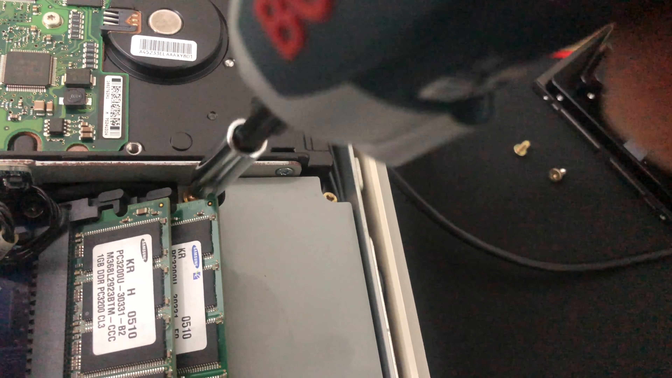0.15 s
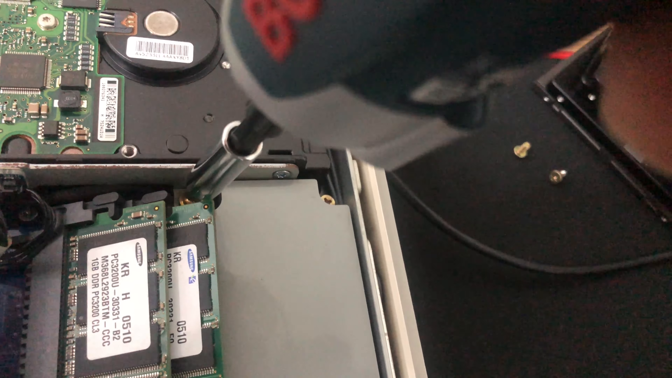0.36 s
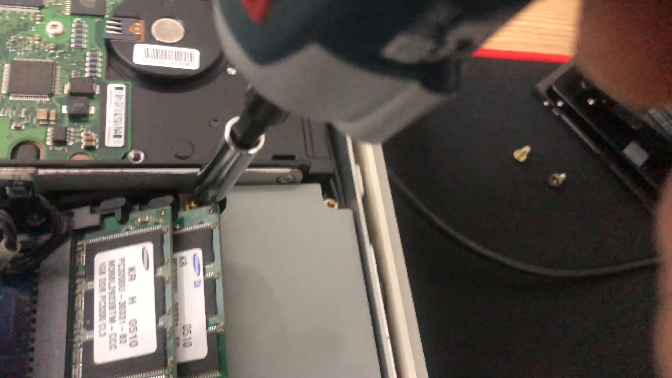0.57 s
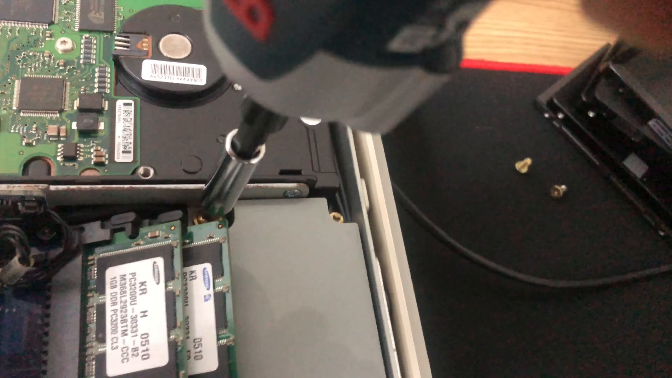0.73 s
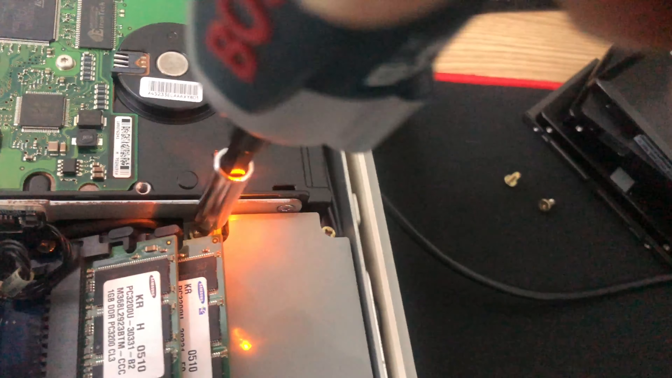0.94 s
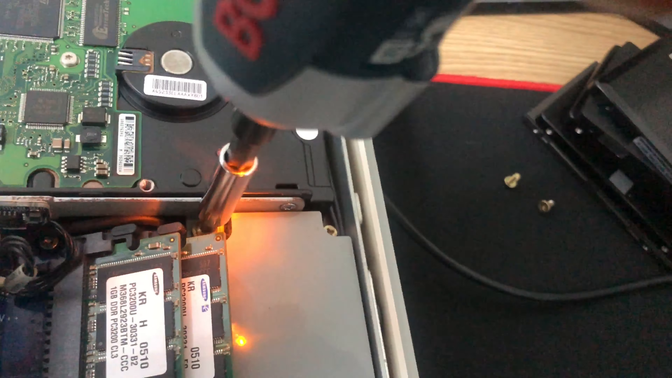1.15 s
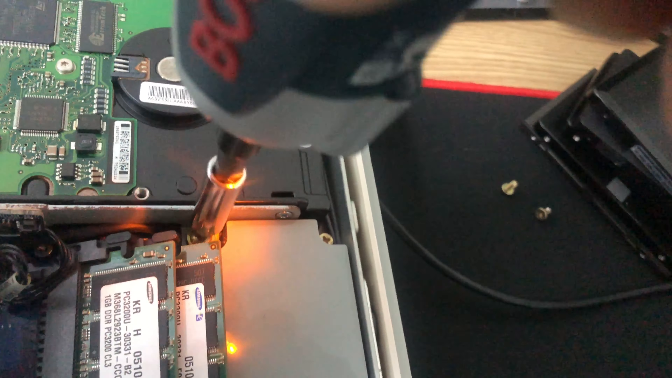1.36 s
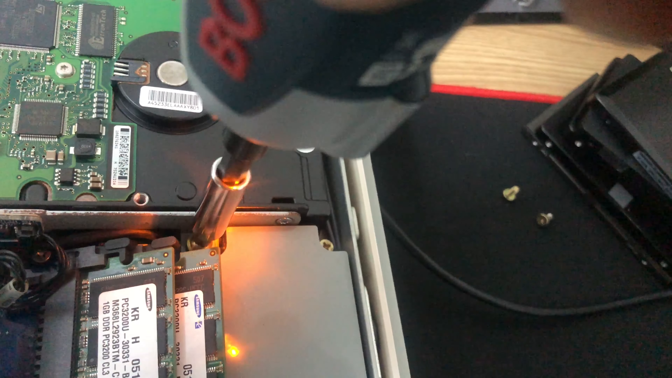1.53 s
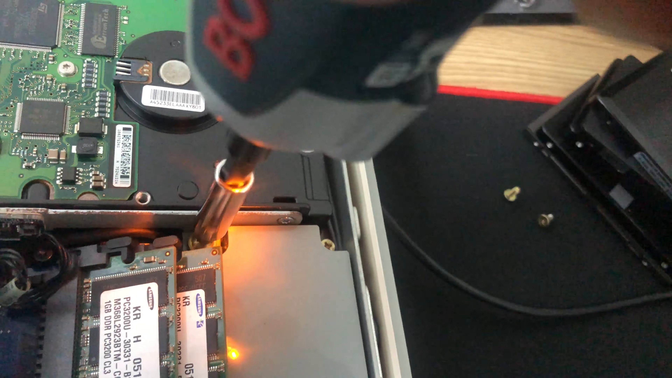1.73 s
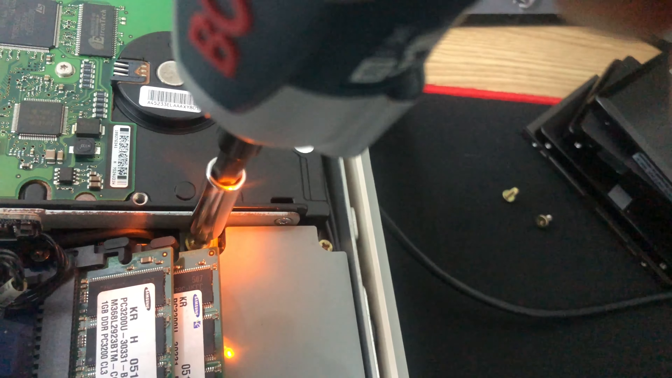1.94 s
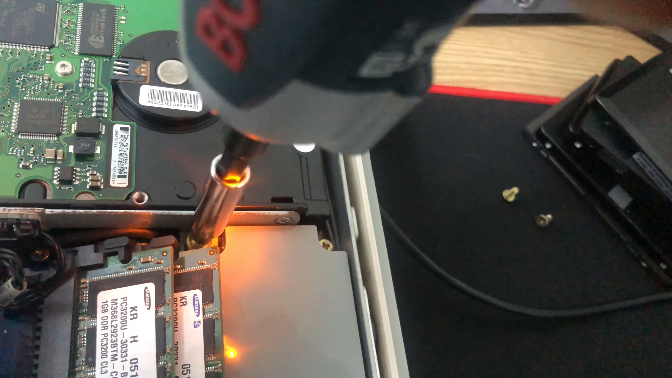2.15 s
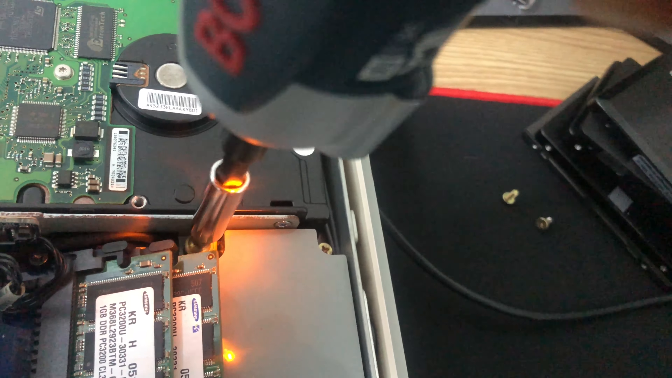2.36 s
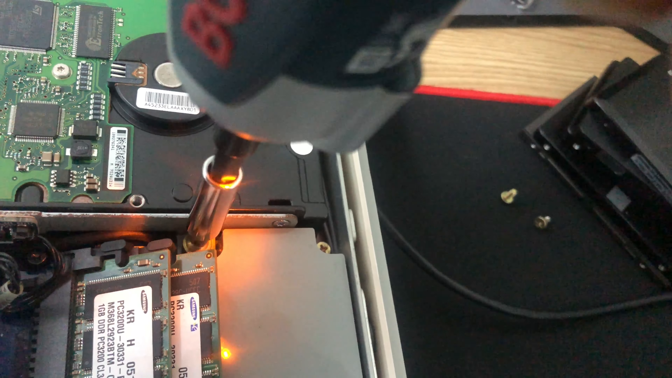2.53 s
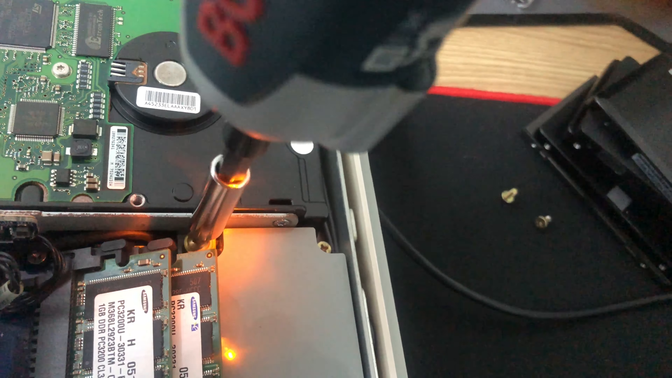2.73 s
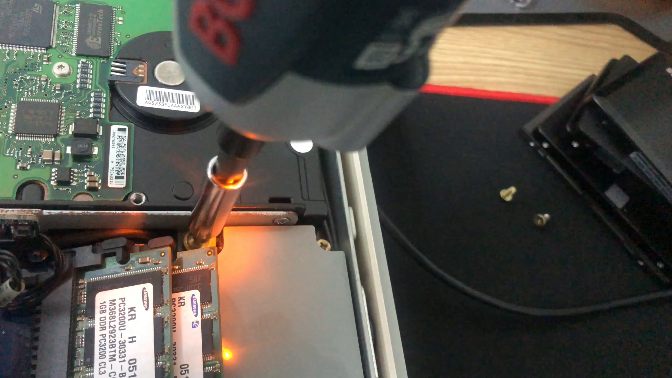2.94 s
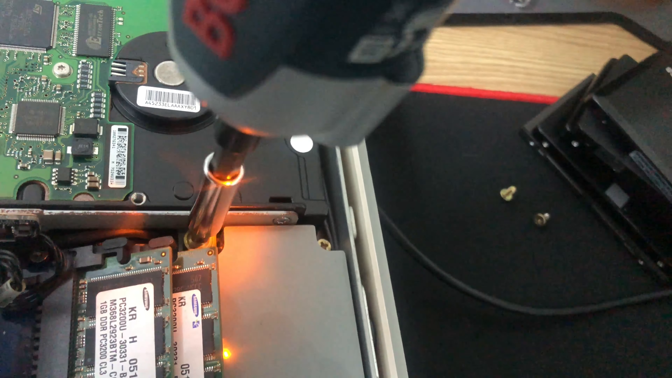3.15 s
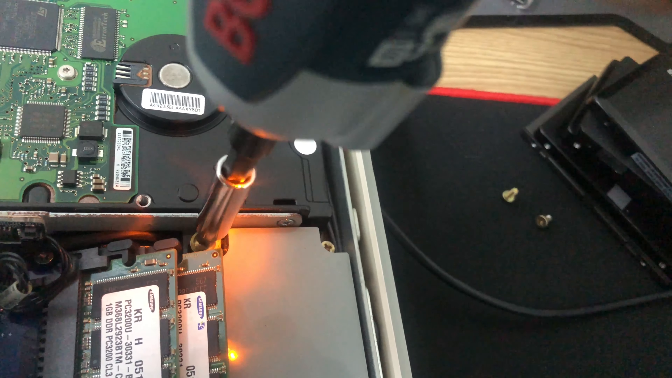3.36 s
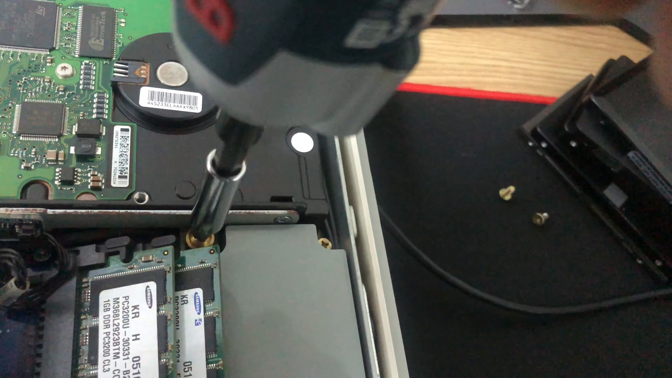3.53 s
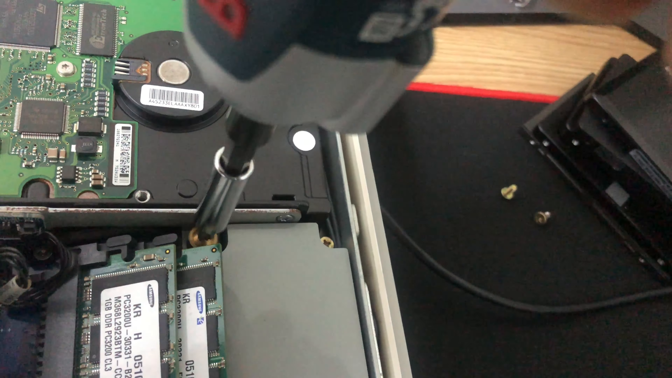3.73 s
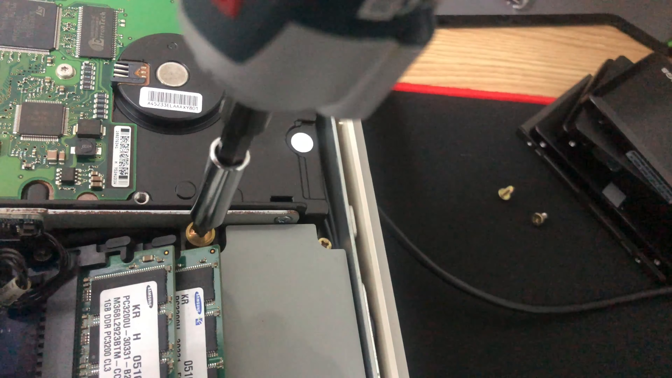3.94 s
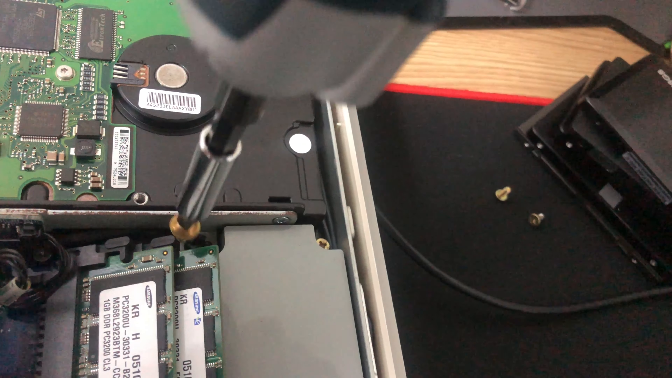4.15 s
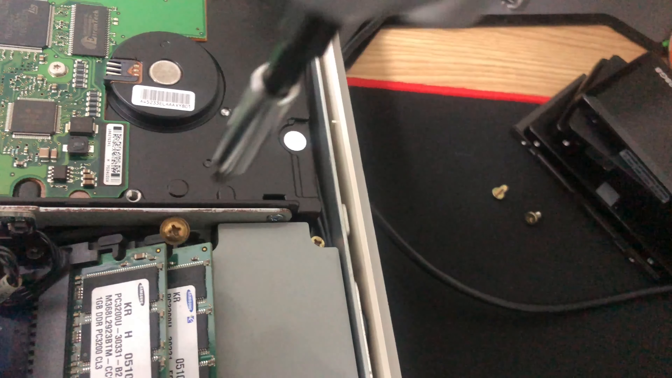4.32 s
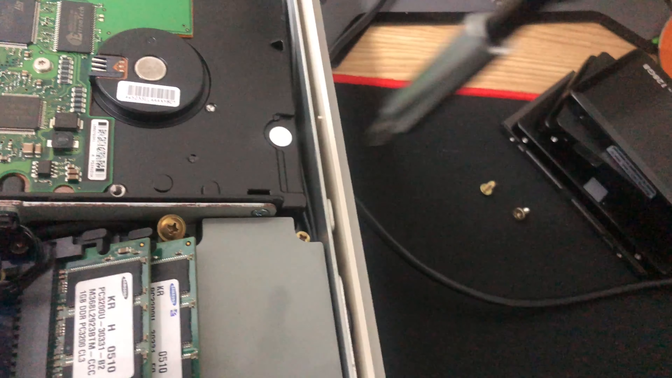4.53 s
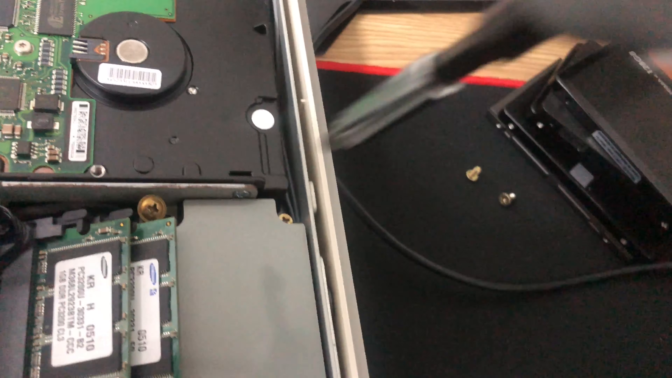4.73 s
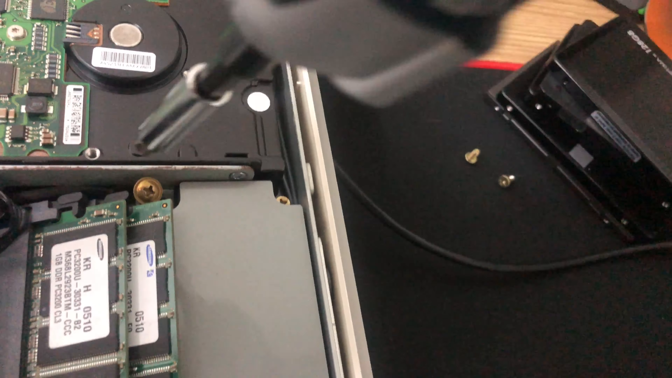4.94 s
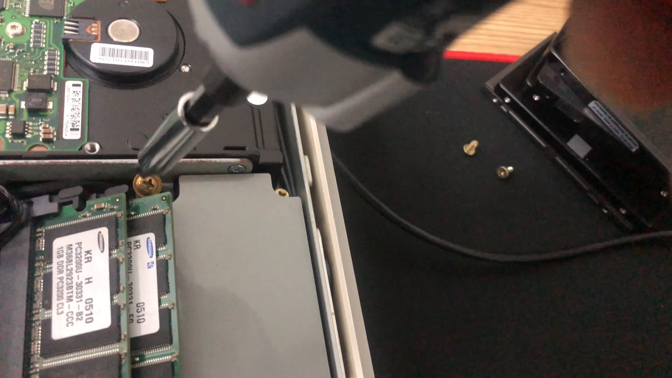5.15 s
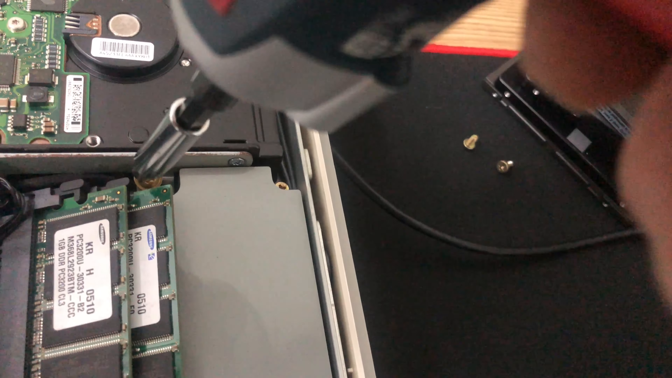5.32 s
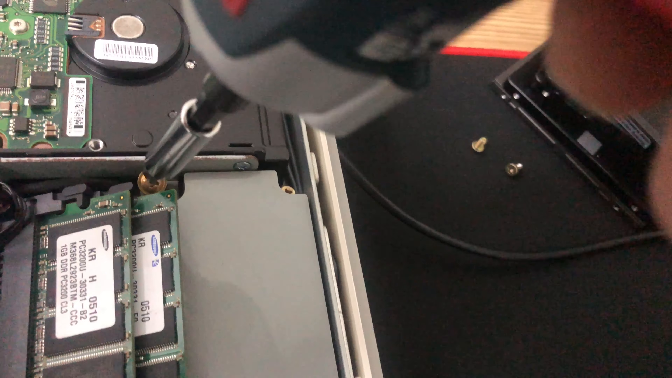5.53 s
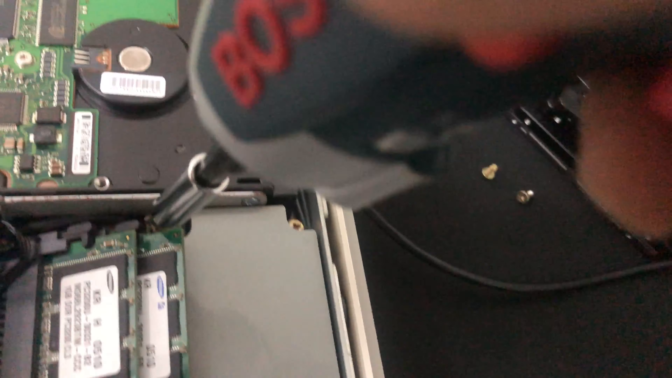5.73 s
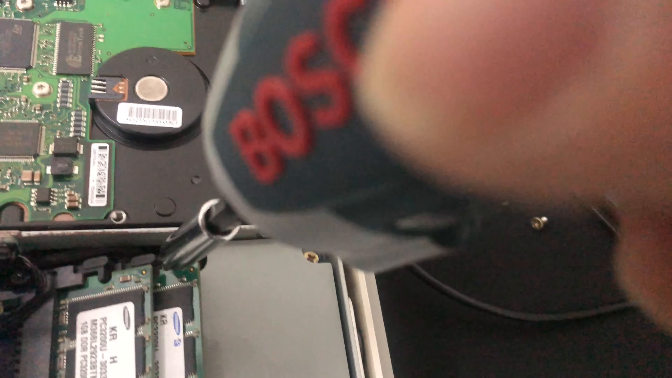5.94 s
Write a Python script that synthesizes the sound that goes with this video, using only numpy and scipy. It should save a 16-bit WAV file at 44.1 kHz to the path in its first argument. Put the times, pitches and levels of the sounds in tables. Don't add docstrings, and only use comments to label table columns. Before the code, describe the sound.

Close up in a quiet room, a screwdriver bit ticks and knocks against a metal chassis for about a second. The small motor then starts sharply, whining and rattling with gritty gears for two and a half seconds, dipping slightly as the screw binds. It coasts down in falling pitch, followed by scrapes and clicks, near silence, a tiny squeak, and bright final clicks.

```python
import sys
import numpy as np
from scipy import signal
from scipy.fft import rfft, irfft, next_fast_len
from scipy.io import wavfile
from scipy.ndimage import uniform_filter1d, map_coordinates

SR = 44100
rng = np.random.default_rng(int(sys.argv[2]) if len(sys.argv) > 2 else 0)


def to_wav(s):
    ch = np.atleast_2d(s).T
    pcm = np.round(np.clip(ch, -1, 1) * 32767)
    wavfile.write(sys.argv[1], SR, pcm.astype(np.int16))


def voltage_ratio(decibels):
    exponent = np.asarray(decibels, float) / 20
    return 10 ** exponent


N = 268128
T = np.arange(N) / SR


def unit(x):
    return x / np.sqrt(np.mean(x ** 2) + 1e-20)


def along(points, hz):
    f, v = np.transpose(points)
    return np.interp(np.log(hz + 1), np.log(f + 1), v)


def curves(rows):
    s, *cols = np.transpose(rows)
    return [np.interp(T, s, c) for c in cols]


def span(start_s, end_s):
    return uniform_filter1d(1. * (T > start_s) * (T < end_s), size=90)


def wobble(rate):
    coarse = T[::8]
    knots = rng.standard_normal(int(N * rate / SR) + 4)
    return np.interp(T, coarse, map_coordinates(knots, [coarse * rate]))


def filtered(x, gain, causal=False):
    m = 2 * next_fast_len(len(x) // 2 + 2048)
    g = gain(np.fft.rfftfreq(m, 1 / SR))
    if causal:
        c = irfft(np.log(g + 1e-6), m)
        c[1:m // 2] *= 2
        c[m // 2 + 1:] = 0
        g = np.exp(rfft(c))
    return irfft(rfft(x, m) * g, m)[:len(x)]


def above(hz, edge_hz, order=4):
    return 1 / np.sqrt(1 + (edge_hz / (hz + 1)) ** (2 * order))


def peak(hz, centre_hz, width_hz):
    return hz * width_hz / np.hypot(centre_hz ** 2 - hz ** 2, hz * width_hz + 1)


# t/s, speed/(turns per s)
SPEED = [
    (0.965, 180),
    (1.065, 240),
    (1.15, 205),
    (1.21, 235.5),
    (1.31, 258.2),
    (1.38, 262.7),
    (1.47, 264.3),
    (1.75, 267),
    (2.9, 267.4),
    (3.49, 268),
]
# t/s, speed lost/(turns per s)
BINDS = [
    (1.6, 5.5),
    (1.87, 8.3),
    (2.18, 4.6),
    (2.49, 3.4),
    (2.82, 3),
]
BIND_S, RECOVER_S = .05, .125
CONTACT_S = .9645
RELEASE_S, TOP_SPEED = SPEED[-1]
COAST_S = .766


def shaft():
    drag = 0
    for s, lost in BINDS:
        width_s = np.where(T < s, BIND_S, RECOVER_S)
        drag = drag + lost * np.exp(-((T - s) / width_s) ** 2)
    progress = np.clip((T - RELEASE_S) / COAST_S, 0, 1)
    coast = TOP_SPEED * (1 - np.sin(np.pi / 2 * progress))
    return np.where(T < RELEASE_S, curves(SPEED)[0] - drag, coast)


IDLE, STALL = 268, 17


def running(speed):
    speed_db = 20 * np.log10(np.clip((speed - STALL) / (IDLE - STALL), 1e-4, 1))
    return speed_db, (IDLE - speed) * (T < RELEASE_S)


PLANET = .593
BLOW_SHARE = 2.2


def planet_knocks(turns, on):
    at = np.flatnonzero(np.diff(np.floor(PLANET * turns)))
    luck = rng.standard_normal((len(at), 2))
    size_db = 2.5 * np.tanh(.6 * luck[:, 1]) + 2 * np.tanh(.7 * wobble(18)[at])
    jitter = (6 * luck[:, 0]).astype(int)
    blows = np.zeros(N)
    blows[np.clip(at + jitter, 0, N - 1)] = voltage_ratio(size_db)
    decay = voltage_ratio(-60 * T[:600] / .0045)
    burst = signal.fftconvolve(blows, decay)[:N] * rng.standard_normal(N)
    colour = lambda f: (0.18 + above(f, 2800, order=2)) / (1 + (f / 9500) ** 4)
    sharp = filtered(burst + BLOW_SHARE * blows, colour, causal=True)
    return unit(sharp * on) * np.sqrt(np.mean(on))


# f/Hz, level/dB per Hz
HOUSING = [(350, -42.5), (600, -16.5), (778, -12.5), (856, -5), (1540, 0), (2810, -9.5), (4230, -4),
           (10100, -2), (11500, -7), (15700, -12.5)]
# f/Hz, width/Hz, level/dB
SHELL = [(1520, 410, -8.5), (2206, 240, -4), (3277, 560, 0), (4215, 300, -3.5), (5670, 32, -3.5),
         (8400, 340, -11), (12200, 600, 0), (14000, 520, -5.5)]
# f/Hz, width/Hz, depth/(0-1)
HOLLOWS = [(2784, 210, 0.3), (3655, 140, 0.7), (13950, 300, .4)]


def shell(f):
    bumps = 1 + sum(voltage_ratio(db) * peak(f, c, w) ** 2 for c, w, db in SHELL)
    dips = np.prod([1 - np.clip(d, 0, .9) * peak(f, c, w) ** 2 for c, w, d in HOLLOWS], axis=0)
    return (voltage_ratio(along(HOUSING, f)) + voltage_ratio(-15.5) * above(f, 150)) * bumps * dips


# level at full speed/dB, growth/(dB per dB of speed), load/(dB per turn/s of lag), clatter share/1
LAYERS = [
    (-33.5, 0.97, 0.32, 0.68),
    (-39, 0.63, 0.03, .3),
    (-35.5, 1.4, 0.48, .4),
]
# t/s, level/dB
CLATTER = [(1.075, 1), (1.21, 3.5), (1.3, -1.5), (1.49, 2), (1.59, 0.5), (1.67, 0.5), (1.77, 5.5),
           (1.95, 3), (2.17, 1.5), (2.26, 5), (2.42, 0.5), (2.8, 2.5), (2.865, 5.5), (3.33, 3.5),
           (3.43, -2.5), (3.69, 5.5), (3.8, 0.5)]
# f/Hz, width/Hz, level/dB, growth/(dB per dB of speed)
BRUSH_RING = (5450, 130, -47.5, .75)
LOAD_TOP = 6.3
CLATTER_S, SPIN_UP_S = .018, .02
KNOCK_DB, KNOCK_SLOW_DB, CLATTER_KNOCK = -8.5, 8, .3


def gears(turns):
    speed = SR * np.gradient(turns)
    speed_db, lag = running(speed)
    on = span(CONTACT_S, RELEASE_S + COAST_S)
    clatter_db = sum(db * np.exp(-((T - s) / CLATTER_S) ** 2) for s, db in CLATTER)
    load_lag = np.clip(lag, 0, LOAD_TOP)
    rattle_db, low_db, fizz_db = [db + grows * speed_db + load * load_lag + share * clatter_db
                                  for db, grows, load, share in LAYERS]
    knock_db = KNOCK_DB + KNOCK_SLOW_DB * (1 - voltage_ratio(speed_db)) + CLATTER_KNOCK * clatter_db

    beat = 1 + 0.15 * np.cos(2 * np.pi * turns)
    beat += 0.063 * np.cos(6 * np.pi * turns) + 0.042 * np.cos(2 * np.pi * turns / 3)
    unevenness = voltage_ratio(0.93 * wobble(15) + 1.7 * wobble(500))
    mesh = unit(rng.standard_normal(N) * beat * unevenness)
    body = filtered(mesh + voltage_ratio(knock_db) * planet_knocks(turns, on), shell, causal=True)
    slow = np.clip(0.7 * (1 - speed / 255), 0, 1)
    body += slow * filtered(body, lambda f: 2.4 * peak(f, 5480, 220) ** 2 - 0.4 * peak(f, 2530, 700) ** 2)

    low = filtered(body, lambda f: 1 - above(f, 2600) ** 2)
    fizz = filtered(body, lambda f: above(f, 7460) ** 2)
    level = lambda v: v / np.sqrt(np.mean((v * on) ** 2) / np.mean(on))
    bands = voltage_ratio(rattle_db) * level(body - low - fizz)
    bands += voltage_ratio(low_db) * level(low) + voltage_ratio(fizz_db) * level(fizz)

    hz, width_hz, ring_db, grows = BRUSH_RING
    sing = unit(filtered(mesh, lambda f: peak(f, hz, width_hz) ** 2)) * voltage_ratio(ring_db + 3 * wobble(9))
    sing = sing * np.clip((speed - STALL / 2) / IDLE, 0, 1) ** grows
    rise = 1 - 0.53 * np.exp(-np.abs(T - CONTACT_S) / SPIN_UP_S)
    return on * (T > CONTACT_S) * rise * (sing + bands)


def order_line(turns, k, db, shake):
    phase = 2 * np.pi * k * turns + 0.22 * shake * wobble(40)
    return voltage_ratio(db + 4 + shake * wobble(30.05)) * np.sin(phase)


# order/1, unloaded level/dB, loss/(dB per turn/s of lag), gain/(dB per s), change once loose/dB
WHINE = [(30, -41, .45, 2.2, 0), (36, -39.5, .4, 1.2, 0), (42, -37, 1.6, 0, -11)]
# order/1, level below the middle one/dB
WHINE_SIDE = [(19, -8.5), (21, -17), (27, -7.5), (33, -12.5), (39, -19), (48, -19)]
LOOSE_S, BRUSH_S = 3.0, .03


def whine(turns):
    speed = SR * np.gradient(turns)
    lag = running(speed)[1]
    loose = uniform_filter1d(1. * (T > LOOSE_S), size=7000)
    low, mid, high = [db - loss * lag + gain * (T - LOOSE_S) + change * loose
                      for _, db, loss, gain, change in WHINE]
    out = order_line(turns, 30, low, .7) + order_line(turns, 36, mid, .6) + order_line(turns, 42, high, .7)
    out += sum(order_line(turns, k, mid + db, 2.2) for k, db in WHINE_SIDE)
    out += order_line(turns, 21, -43, 1.5) * peak(21 * speed, 5450, 130) ** 2
    return span(CONTACT_S, N / SR) * voltage_ratio(-1.6) * span(CONTACT_S, RELEASE_S + BRUSH_S) * out


# order/1, level at full speed/dB, growth/(dB per dB of speed), unsteadiness/dB
HUM = [
    (2, -52, 3, 1.5),
    (3, -50.5, 1.45, 1.7),
    (6, -46.5, .3, 2.6),
]
# order/1, level relative to the third/dB
HUM_SIDE = [(1, -12), (4, -0.5), (5.332, -5), (6.5, -12)]
# t/s, level/dB
PRESS = [
    (1.0, -11),
    (1.4, -4),
    (1.62, -11.5),
    (1.75, 0.5),
    (2.9, 1),
    (3.25, -7.5),
    (3.6, -5.5),
]
HUM_RISE_S, COAST_SING_DB = 0.037, 3


def hum(turns):
    speed = SR * np.gradient(turns)
    speed_db, lag = running(speed)
    second, third, sixth = [db + grows * speed_db for _, db, grows, _ in HUM]
    second = second + curves(PRESS)[0]
    handle_db = 40 * np.log10(peak(6 * speed, 1300, 900) + 1e-4)
    sixth = sixth - 0.08 * lag + handle_db + COAST_SING_DB * (T > RELEASE_S)
    out = sum(order_line(turns, k, db, shake) for (k, _, _, shake), db in zip(HUM, (second, third, sixth)))
    out += order_line(turns, 0.98, -52, 1.8) * peak(speed, 238, 17) ** 2 * span(1.16, 1.3)
    out += sum(order_line(turns, k, third + db + 0.92 * speed_db, 2.2) for k, db in HUM_SIDE)
    out += order_line(turns, 9, -53, 2.19) * peak(9 * speed, 1050, 700) ** 2 * (T > 1.3)
    out += order_line(turns, 21, -42.5, 2.5) * peak(21 * speed, 5150, 900) ** 2 * (T > 3.5)
    rise = (1 - np.exp(-np.abs(T - CONTACT_S) / HUM_RISE_S)) ** 2
    return span(CONTACT_S, N / SR) * rise * out


# t/s, peak level/dB, ring f/Hz, snap rel. level/dB, sizzle rel. level/dB
SEEK = [(0.062, -37.5, 2680, -11.5, -34), (0.113, -51.5, 635, 4, -9), (0.17, -34.5, 2560, -10, -12),
        (0.266, -26, 875, 2.5, -9), (0.352, -52, 564, -7, -30), (0.37, -58, 8000, -30, -22),
        (0.403, -59, 8050, -30, -22), (0.493, -58, 8100, -30, -22), (0.385, -31, 916, -6, -38),
        (0.424, -59, 883, -8, -28), (0.545, -31.5, 2720, -7, -16), (0.552, -24.5, 1650, -6, 0.5),
        (0.557, -34, 540, 2.5, 6.5), (0.677, -45, 810, -24, -29), (0.716, -44, 1010, -22, -26),
        (0.73, -38, 930, -18, -21), (0.745, -51, 552, -0.5, -18), (0.772, -48, 1950, -14, -26),
        (0.784, -58, 1050, 2, 0), (0.812, -29.5, 2110, -4.5, -4.5), (0.816, -35.5, 1460, -21, -11),
        (0.931, -44, 1250, -5, -22), (0.935, -53, 1250, 6, -8), (0.958, -29.5, 1630, -17, -2)]
LIFT = [(4.186, -48, 3300, -1, -15), (4.201, -24.5, 6200, -11, -4), (4.236, -37.5, 1560, -10, -22),
        (4.254, -40, 2400, -12, -22), (4.274, -36, 2900, -12, -18), (4.36, -31, 610, -3.5, 6),
        (4.377, -37.5, 660, -2, 5), (4.396, -37, 2480, -15, -8), (4.407, -35, 4030, -11, -2),
        (4.416, -26.5, 1570, -5.5, 0), (4.45, -44, 1410, -7, -20)]
RESEAT = [
    (5.708, -37, 864, -15, -6.5),
    (5.719, -41, 993, -13, -9),
    (5.776, -61, 576, -4, -26),
    (5.86, -33, 1475, 2.5, -18),
    (5.86, -23.5, 4400, -8, -30),
    (5.891, -39, 1600, -9, -14),
    (5.899, -26, 4560, -5.5, -16),
    (5.908, -42, 1010, -20, 3),
]
THUMP_DB = (-14.5, -16, -25)
THUMP_PER_DB, THUMP_PER_OCTAVE = 0.18, 5.4


def ticks():
    out, t = np.zeros(N + SR), T[:2800]
    top = lambda v: v / np.max(abs(v))

    def puff(t60, gain):
        return top(filtered(rng.standard_normal(len(t)) * voltage_ratio(-60 * t / t60), gain, causal=True))

    for rows, soft_db in zip((SEEK, LIFT, RESEAT), THUMP_DB):
        for s, db, hz, snap_db, sizzle_db in rows:
            thump_db = soft_db - THUMP_PER_DB * (db + 50) - THUMP_PER_OCTAVE * np.log2(hz / 1000)
            ring = np.sin(2 * np.pi * hz * t) * voltage_ratio(-60 * t * hz ** .5 / .62) * (1 - np.exp(-t / .0003))
            snap = puff(0.016, lambda f: above(f, 900, order=2) / (1 + (f / 5500) ** 4))
            sizzle = puff(0.012, lambda f: above(f, 6600, order=3) / (1 + (f / 11000) ** 4))
            thump = puff(0.068, lambda f: peak(f, 260, 330))
            hit = voltage_ratio(-4) * ring + voltage_ratio(snap_db) * snap
            hit += voltage_ratio(sizzle_db - 1.5) * sizzle + voltage_ratio(thump_db + 8) * thump
            out[round(s * SR):][:len(t)] += voltage_ratio(db) * hit
    return out[:N]


# t/s, peak level/dB, f/Hz
BUMPS = [
    (0.27, -52, 130),
    (0.559, -48, 143),
    (0.737, -50.5, 131.3),
    (1.059, -46, 134.7),
    (5.729, -52, 86.1),
    (5.903, -68, 4560),
    (5.903, -68, 2250),
]


def bumps():
    out, t = np.zeros(N + SR), T[:2800]
    for s, db, hz in BUMPS:
        swell = 1 - np.exp(-t / 0.0038)
        out[round(s * SR):][:len(t)] += voltage_ratio(db + 7.0 - 60 * t / 0.11) * np.sin(2 * np.pi * hz * t) * swell
    return out[:N]


# t/s, length/s, starting level/dB, change by the end/dB, bright part rel. level/dB
STROKES = [(0, .12, -77, -4, -16), (0.316, 0.35, -82, 0, -8), (.575, 0.13, -65.5, -23, -10),
           (.69, 0.12, -83, 2, 5.5), (.83, 0.12, -84, 10, -5), (4.206, 0.076, -56.5, 4.5, -27),
           (4.286, 0.043, -71, -5, -16), (4.425, 0.094, -61.5, -20, -14), (4.49, 0.24, -90, -5, -1),
           (5.709, .07, -57, -29, -29), (5.766, 0.075, -91, 7, -14), (5.92, 0.1, -69, -18, -11)]
# t/s, half length/s, level/dB, bright part rel. level/dB
SLEEVE = (4.91, .14, -84, -3)


def rubbing():
    grit = rng.standard_normal(N) * voltage_ratio(3.5 * wobble(250) + 2 * wobble(60))
    chassis = lambda f: above(f, 780, order=2) * (1 + 1.1 * peak(f, 2240, 900)) / (1 + (f / 2600) ** 2)
    dull = unit(filtered(grit, chassis))
    bright = unit(filtered(grit, lambda f: above(f, 4200, order=2) / (1 + (f / 7000) ** 2)))
    s, half_s, db, rel_db = SLEEVE
    out = voltage_ratio(db) * np.exp(-((T - s) / half_s) ** 2) * (dull + voltage_ratio(rel_db) * bright)
    for s, long_s, db, change_db, rel_db in STROKES:
        level_db = db + change_db * np.clip((T - s) / long_s, 0, 1)
        out += span(s, s + long_s) * voltage_ratio(level_db) * (dull + voltage_ratio(rel_db) * bright)
    return out


# level/dB, rise/s, t60/s
SQUEAK_PARTS = [
    (-67.5, .05, .5),
    (-72, 0.013, .22),
]
SQUEAK_S, SQUEAK_HZ, SQUEAK_CLIMB_HZ, SQUEAK_SETTLE_S = 5.518, 4030, 160, .03
SQUEAK_RATIO = 1.15


def squeak():
    t = np.clip(T - SQUEAK_S, 0, None)
    pitch_hz = SQUEAK_HZ - SQUEAK_CLIMB_HZ * np.exp(-t / SQUEAK_SETTLE_S)
    phase = 2 * np.pi * np.cumsum(pitch_hz) / SR
    low_db, high_db = [db - 60 * t / t60 + 20 * np.log10(1.0001 - np.exp(-t / rise_s))
                       for db, rise_s, t60 in SQUEAK_PARTS]
    low = voltage_ratio(low_db + 3 + 3 * wobble(90)) * np.sin(phase + 1.1 * wobble(220))
    high = voltage_ratio(high_db + 5 + 3.6 * wobble(150)) * np.sin(SQUEAK_RATIO * phase + 2.3 * wobble(300))
    return span(SQUEAK_S, SQUEAK_S + .17) * (low + high)


# f/Hz, t60/s
ROOM = [(300, 0.25), (2000, 0.12), (10000, 0.044)]


def room(x):
    hz, t, z = signal.stft(rng.standard_normal(SR // 2), SR, nperseg=256)
    decay = voltage_ratio(-60 * t / along(ROOM, hz)[:, None])
    tail = signal.istft(z * decay, SR, nperseg=256)[1]
    delayed = np.pad(x, (150, 0))
    return signal.fftconvolve(delayed, tail / np.linalg.norm(tail))[:N]


# f/Hz, level/dB per Hz
AIR = [(25, -27), (45, -6.5), (108, -0.5), (160, -8), (350, -8), (750, -17.5), (1300, -21.5), (2200, -33),
       (4000, -39.5), (8000, -45), (14000, -48.5), (15000, -50.5), (15300, -120)]
AIR_DB = -60.5


def air():
    hush = unit(filtered(rng.standard_normal(N), lambda f: voltage_ratio(along(AIR, f))))
    drone = voltage_ratio(-70 + 4 + 2.5 * wobble(11)) * np.sin(2 * np.pi * 211 * T + 2.6 * wobble(12))
    return voltage_ratio(AIR_DB + 1.3 * wobble(3)) * hush + drone


TOP_HZ, CLICK_TOP_HZ = 15820, 16900
ECHO_DULL_HZ = 3500


def scene():
    turns = np.cumsum(shaft()) / SR
    drive = gears(turns)
    contacts = ticks() + bumps()
    dulled = filtered(contacts, lambda f: 1 / np.hypot(1, (f / ECHO_DULL_HZ) ** 2))
    echo = room(voltage_ratio(-14) * drive + voltage_ratio(-15) * dulled)
    steady = drive + echo + hum(turns) + whine(turns) + rubbing() + squeak() + air()
    edge = lambda f, top_hz, width_hz: np.clip((top_hz - f) / width_hz, 0, 1)
    steady = filtered(steady, lambda f: edge(f, TOP_HZ, 80))
    sudden = filtered(contacts, lambda f: edge(f, CLICK_TOP_HZ, 1200))
    return (steady + sudden)[None]


def band_limit(x):
    return signal.sosfilt(signal.butter(12, 17000, fs=SR, output="sos"), x)


def record(dry):
    return band_limit(dry)


dry = scene()
out = record(dry)
to_wav(out)
```